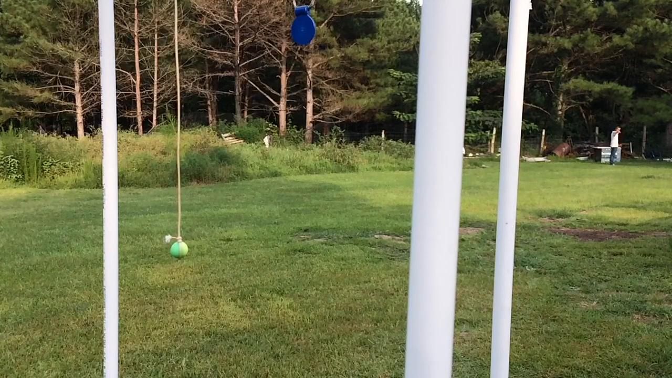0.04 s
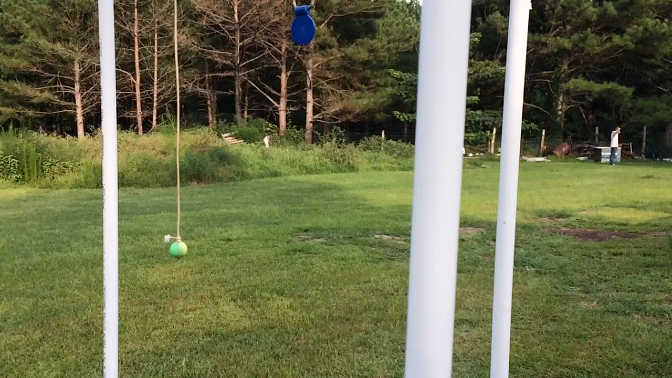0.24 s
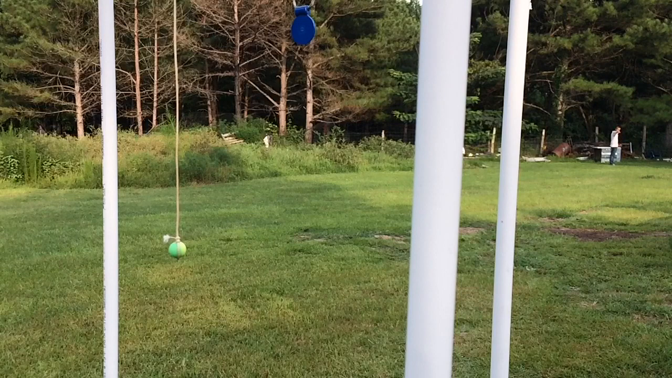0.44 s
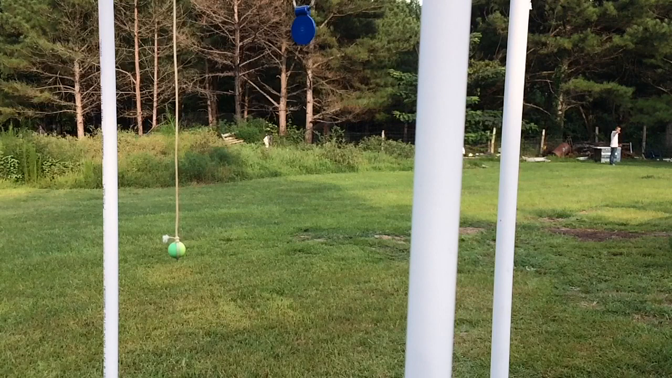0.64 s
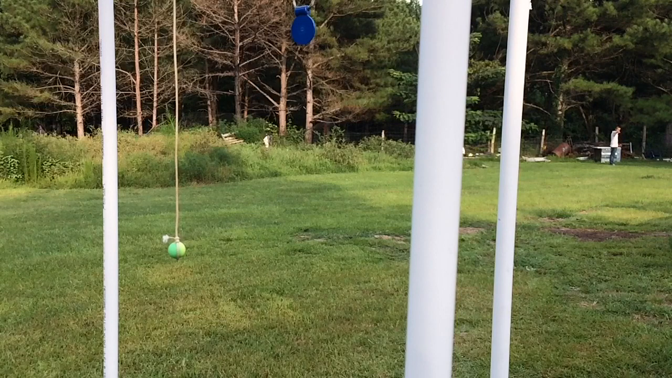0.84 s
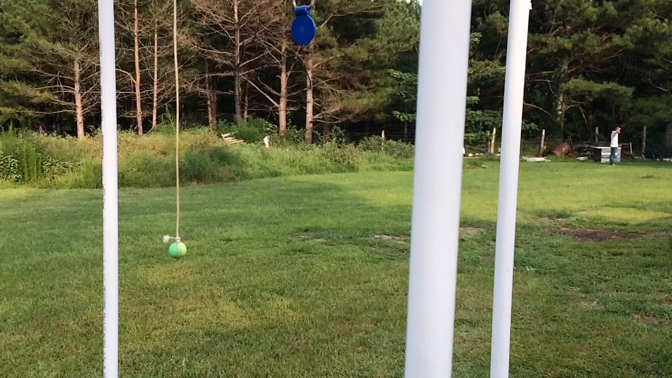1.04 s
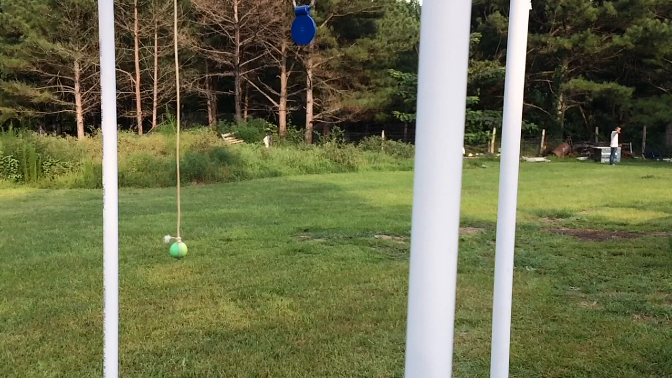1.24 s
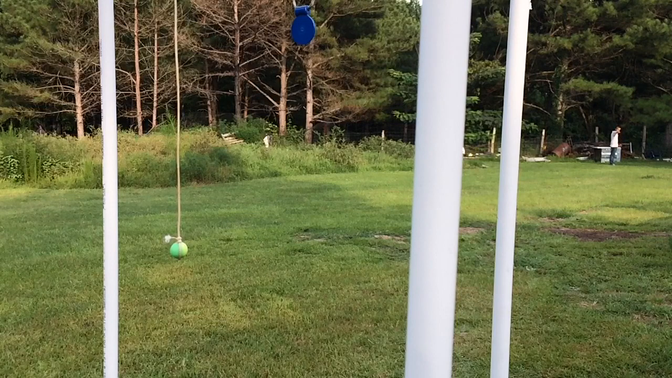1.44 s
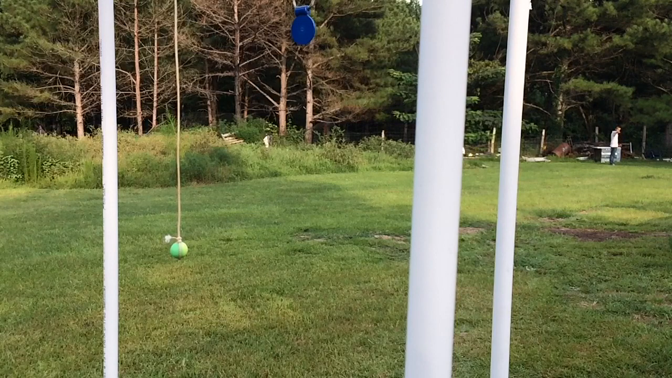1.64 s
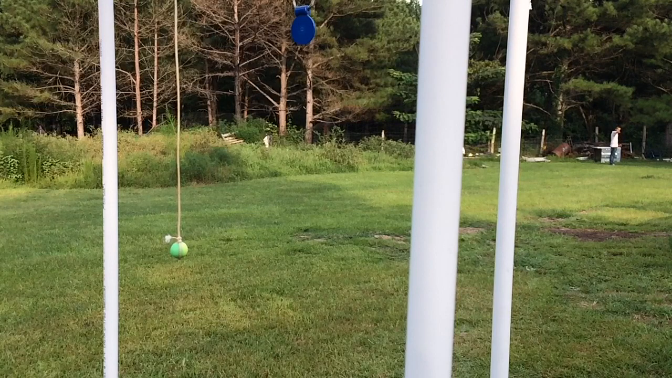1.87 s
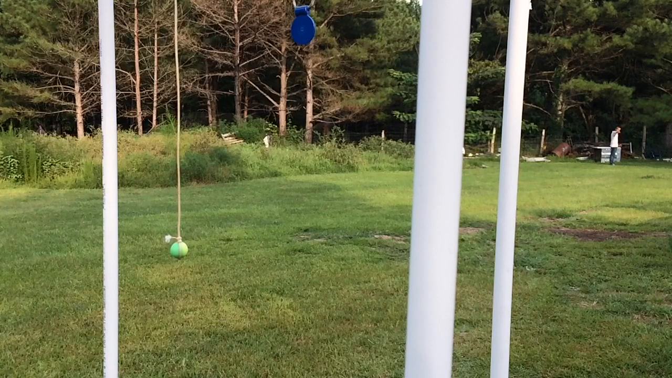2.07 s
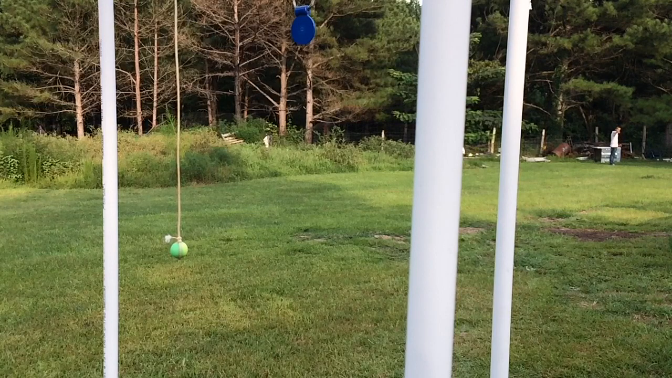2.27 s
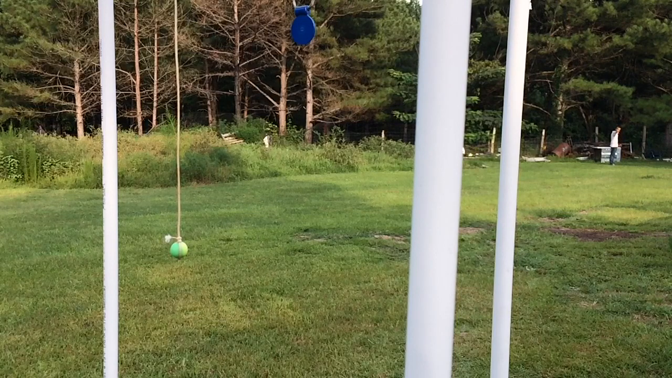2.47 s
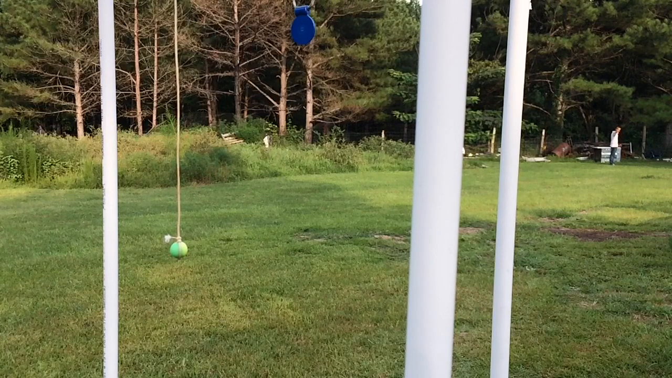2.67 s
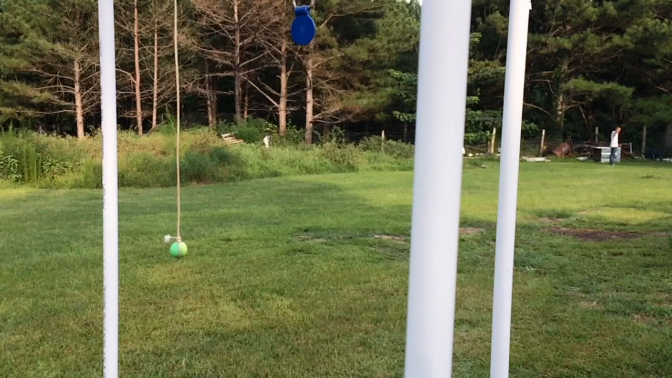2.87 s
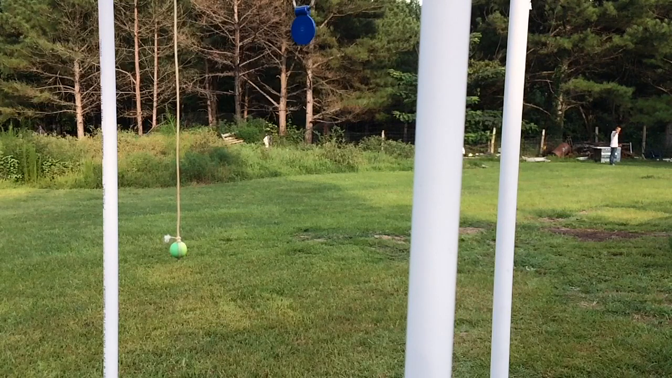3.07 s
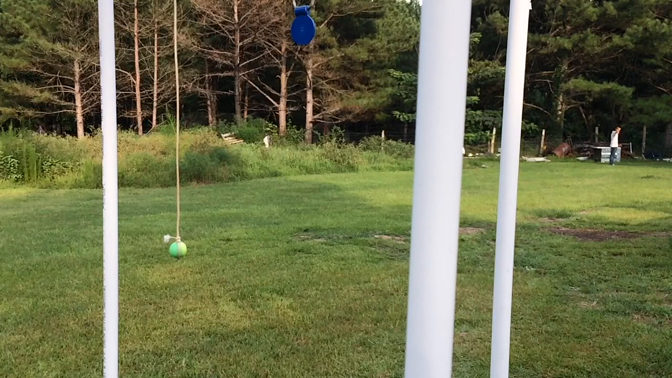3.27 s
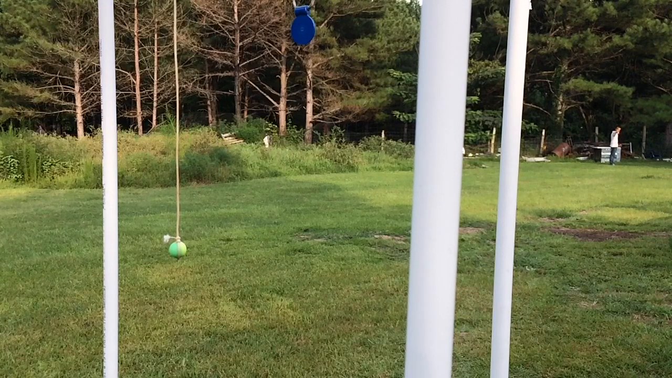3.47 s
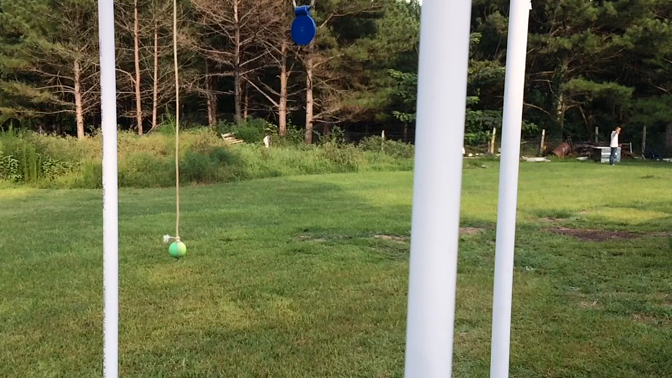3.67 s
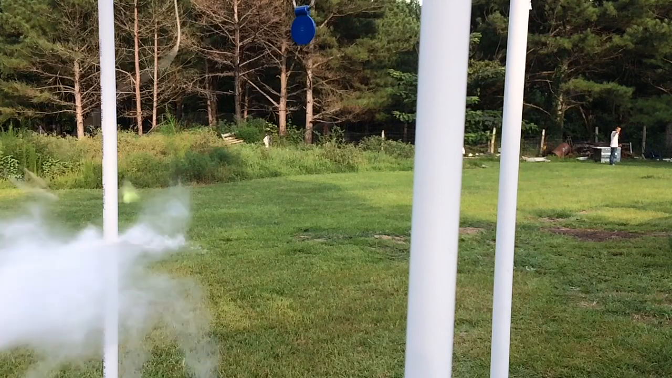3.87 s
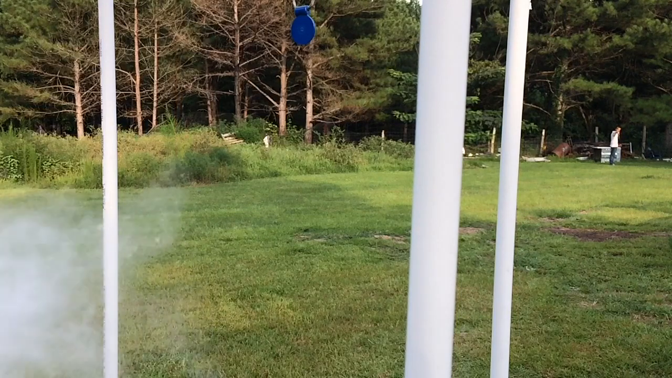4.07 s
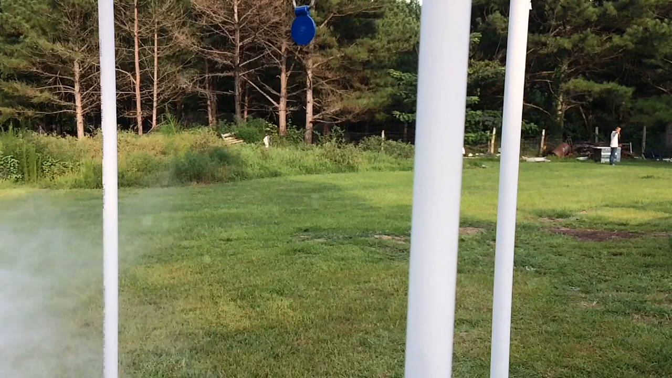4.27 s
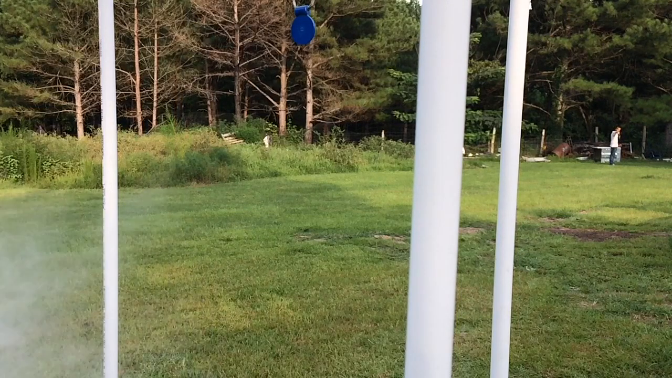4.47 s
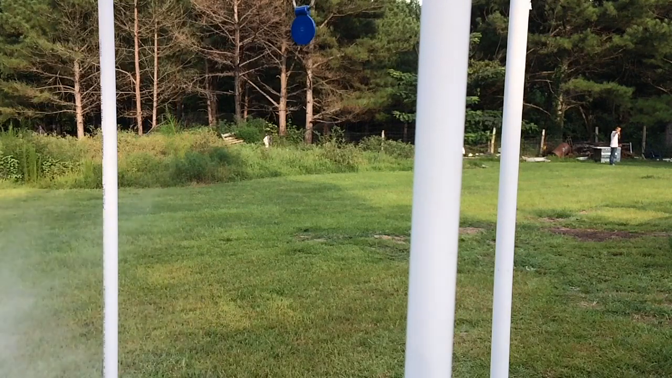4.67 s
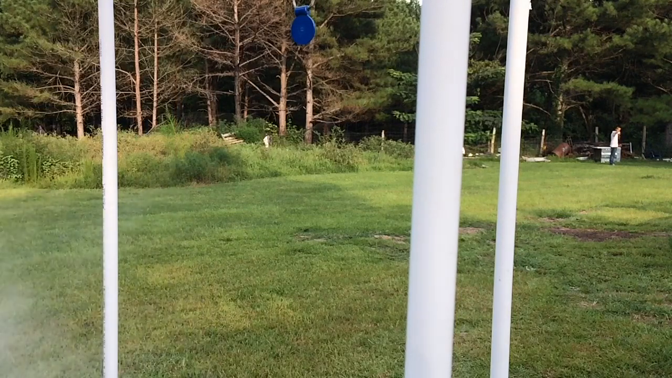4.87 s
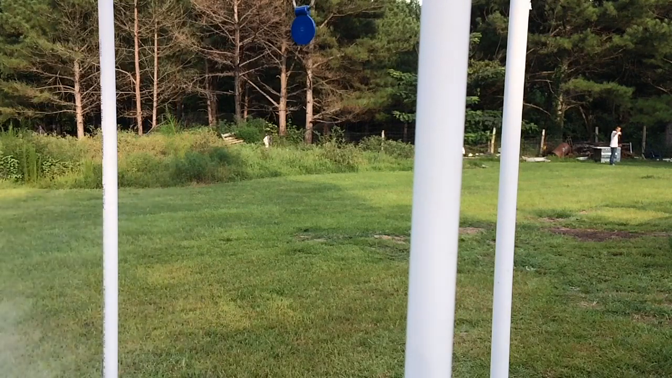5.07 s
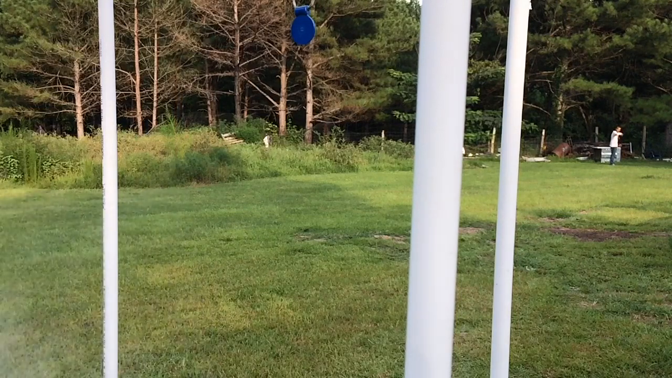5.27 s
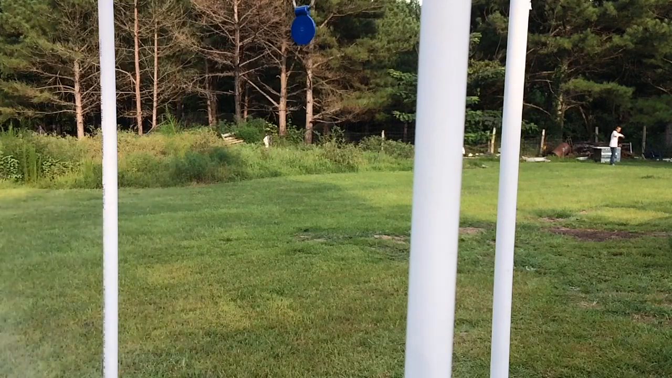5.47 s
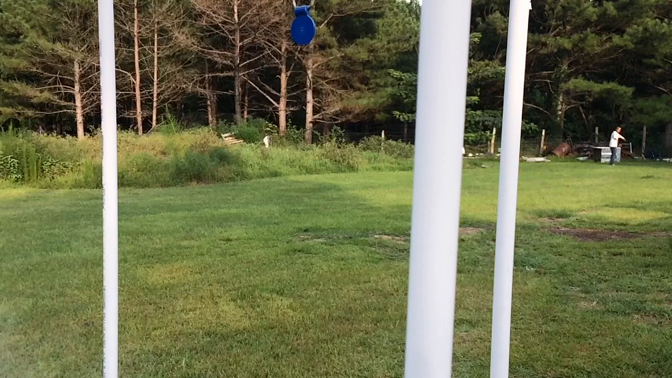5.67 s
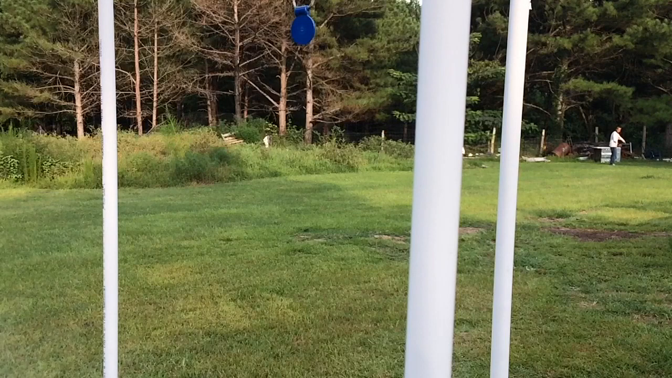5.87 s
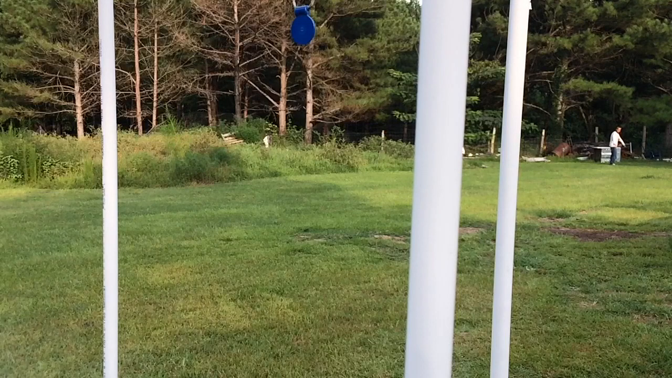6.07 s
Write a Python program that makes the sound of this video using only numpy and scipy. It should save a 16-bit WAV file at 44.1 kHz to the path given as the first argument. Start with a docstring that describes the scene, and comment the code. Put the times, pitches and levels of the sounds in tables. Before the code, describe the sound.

A slowed-down slingshot whips and slaps across a lawn, and the shot cracks into a close target, echoing over droning insects.

```python
"""A lawn edged by trees, the microphone beside a hanging target. Insects trill, a far bird calls, and
playback sinks to quarter speed. Across the grass a slingshot's bands whip and slap the fork. The ball
rushes closer, bursts the target, knocks on something behind it and hums away, shedding vortices.
Bits patter down and the tree line throws the crack back while the recorder's gain recovers.
The shot's pitches and all event times are as heard, slowed down, unless marked as real time."""
import sys
import numpy as np
from scipy import signal
from scipy.fft import rfft, irfft
from scipy.io import wavfile
from scipy.ndimage import uniform_filter1d, minimum_filter1d, map_coordinates

SR = 44100
rng = np.random.default_rng(int(sys.argv[2]) if len(sys.argv) > 2 else 0)


def put_to_file(sound):
    """Save the sound as 16-bit audio at rate SR, in the file named by the first command-line argument."""
    columns = np.atleast_2d(sound).T  # one column per channel
    safe = np.clip(columns, -1, 1)
    whole_steps = np.round(safe * 32767)
    wavfile.write(sys.argv[1], SR, whole_steps.astype(np.int16))


N = 269892
TIME_S = np.arange(N) / SR
LAUNCH_S, HIT_S, PASS_S = 3.0, 4.0537, .05 + 4.0204
SLOW_FROM_S, SLOW_UNTIL_S, SLOW_SPEED, STEPS_PER_S = 1.15, 1.63, .25, 30
SLOWED_TOP_HZ, RECORDER_TOP_HZ = 3920, 15750


def from_db(db):
    """Decibels to gain."""
    return 10 ** (np.asarray(db) / 20)


def rms_one(x):
    """Scale to unit rms."""
    return x / np.sqrt(np.mean(x ** 2) + 1e-20)


def fade(exponent):
    """Exponential fall to a floor far below hearing."""
    return np.exp(-np.minimum(exponent, 20))


def coloured(x, spectrum):
    """Give white noise a spectrum (freq_hz, density_db) that falls away beyond its ends; rms 1."""
    hz = np.maximum(np.arange(N // 2 + 1) * SR / N, 1)
    points_hz, db = np.transpose(spectrum)
    skirts = np.minimum(hz / points_hz[0], 1) ** 2 * np.minimum(points_hz[-1] / hz, 1) ** 4
    shape = from_db(np.interp(np.log(hz), np.log(points_hz), db))
    return rms_one(irfft(rfft(x) * skirts * shape, N))


def noise(spectrum):
    """Steady noise of rms 1 with a spectrum (freq_hz, density_db)."""
    return coloured(rng.standard_normal(N), spectrum)


def drift(rate_hz):
    """A smooth random wander of rms 1."""
    hz = np.arange(N // 2 + 1) * SR / N
    return rms_one(irfft(rfft(rng.standard_normal(N)) * np.exp(-(hz / rate_hz) ** 2), N))


def wavering(hz, width_hz):
    """An unsteady tone of rms 1: a narrow band that follows a pitch."""
    phase = 2 * np.pi * np.cumsum(hz * np.ones(N)) / SR
    return drift(width_hz) * np.cos(phase) + drift(width_hz) * np.sin(phase)


def low_pass(x, top_hz):
    """Steep cut of the treble that keeps the timing."""
    return signal.sosfiltfilt(signal.ellip(8, .1, 45, top_hz, fs=SR, output="sos"), x)


def bursts(blows):
    """Envelope of blows (peak_s, level_db, rise_s, decay_s) that swell and die; their powers add."""
    power = 0
    for peak_s, db, rise_s, decay_s in blows:
        from_peak = np.maximum((peak_s - TIME_S) / rise_s, (TIME_S - peak_s) / decay_s)
        power += (from_db(db) * fade(from_peak)) ** 2
    return np.sqrt(power)


def taps(rows, rise_share):
    """Envelope of taps (peak_s, level_db, decay_s), each rising in a share of its decay time."""
    return bursts([(s, db, rise_share * decay_s, decay_s) for s, db, decay_s in rows])


def struck(blows, modes, grit):
    """Each blow, part clean click and part rough contact, drives a body's resonances."""
    def body(force):
        ring = 0
        for k, (hz, width_hz, db) in enumerate(modes):
            radius = np.exp(-np.pi * width_hz / SR)
            poles = [1, -2 * radius * np.cos(2 * np.pi * hz / SR), radius ** 2]
            ring += (-1) ** k * from_db(db) * signal.lfilter([1 - radius, 0, radius - 1], poles, force)
        return ring
    clicks, white = np.zeros(N), rng.standard_normal(N)
    for s, db, rise_s, decay_s in blows:
        clicks[round(s * SR)] += from_db(db) * np.sqrt((rise_s + decay_s) * SR / 2)   # contact energy
    contact = np.sqrt(1 - grit ** 2) * clicks + grit * white * bursts(blows)
    return body(contact) / np.std(body(white))


def playback_speed():
    """The speed eases down from real time in small steps."""
    step_s = np.round(TIME_S * STEPS_PER_S) / STEPS_PER_S
    along = np.clip((step_s - SLOW_FROM_S) / (SLOW_UNTIL_S - SLOW_FROM_S), 0, 1)
    return SLOW_SPEED ** (3 * along ** 2 - 2 * along ** 3)


# Tick of a speed step: freq_hz, density_db
STEP_TICK_SPECTRUM = [(1000, -8), (3000, -3), (5500, -2), (8000, -14), (12000, -26)]
def step_ticks(speed, from_s=1.35, lag_s=.0047):
    """Late in the slow-down each step leaves a faint tick, softer as the speed falls."""
    steps = np.arange(int(from_s * STEPS_PER_S), int(SLOW_UNTIL_S * STEPS_PER_S))
    ticks = [(s, -62, .0003, .0005) for s in (steps + .5) / STEPS_PER_S + lag_s]
    return speed * bursts(ticks) * noise(STEP_TICK_SPECTRUM)


# One gust on the microphone: peak_s, level_db, rise_s, decay_s
GUST = [(6.11, -55.5, 0.033, 0.073)]
def breeze(level_db=-70):
    """Moving air rumbles softly on the microphone."""
    rumble = noise([(28, 2.0), (60, -4), (130, -22), (260, -13.5), (400, -23.5)])
    return (from_db(level_db) + bursts(GUST)) * rumble


def cricket(chirps, pitch_hz, width_hz, half_s, stroke_hz):
    """Short chirps (middle_s in real time, level_db), each a run of wing strokes."""
    swell = sum(from_db(db) * fade(((TIME_S - s) / half_s) ** 2) for s, db in chirps)
    strokes = np.sin(np.pi * stroke_hz * TIME_S) ** 2
    return swell * strokes * wavering(pitch_hz, width_hz) * np.sqrt(2)


# Open air and the insect chorus all round, in real time: freq_hz, density_db
AIR_SPECTRUM = [(25, -5.5), (60, 2), (120, 3.5), (190, -8), (300, -16), (600, -14), (1000, -16.5),
                (1600, -21), (2500, -26), (5500, -28.5), (11000, -36), (15500, -29)]
CHORUS_SPECTRUM = [(5900, -31.5), (6450, -21.5), (6750, -9), (7050, -2), (7300, -5.5), (7750, 0.5),
                   (8150, -4.5), (8550, -10.5), (8900, -24.5), (9600, -20.5), (10500, -48)]
# A lower cricket in the grass, chirping unevenly: middle_s, level_db
UNEVEN_CHIRPS = [(.05, -69), (.23, -69), (.43, -66.5), (.63, -65), (.82, -63), (1.04, -64.5), (1.3, -69),
                 (2.059, -63), (2.7, -69), (5.8, -66)]
def meadow(speed, air_db=-62, chorus_db=-56.5, chirp_db=-65, chirp_every_s=.248):
    """Air, insects and a near cricket as even as a clock, made in real time and read out slowing."""
    real_s = np.cumsum(speed) / SR
    chorus = from_db(chorus_db) * noise(CHORUS_SPECTRUM)
    even = [(s, chirp_db) for s in np.arange(.125, real_s[-1], chirp_every_s)]
    uneven = [(np.interp(s, TIME_S, real_s), db) for s, db in UNEVEN_CHIRPS]
    high = cricket(even, pitch_hz=9560, width_hz=240, half_s=.038, stroke_hz=105)
    low = cricket(uneven, pitch_hz=9200, width_hz=180, half_s=.035, stroke_hz=126)
    air = from_db(air_db) * noise(AIR_SPECTRUM)
    ambience = low_pass(air + chorus + high + low, RECORDER_TOP_HZ)
    return map_coordinates(ambience, [real_s * SR], order=5)


def bird(notes, partials_db, speed, blur_hz, blur, squareness):
    """Far notes swell, glide and fade, blurred by the woods; their pitch sinks with playback speed."""
    haze = [(drift(blur_hz), drift(blur_hz)) for _ in partials_db]
    song = 0
    for middle_s, half_s, hz, db, glide, overtones_db in notes:
        along = (TIME_S - middle_s) / half_s
        phase = 2 * np.pi * np.cumsum(hz * (1 + glide * np.tanh(along)) * speed) / SR
        swell = from_db(db) * fade(abs(along) ** squareness)
        for k, (partial_db, (sin_haze, cos_haze)) in enumerate(zip(partials_db, haze), 1):
            partial = (1 + blur * sin_haze) * np.sin(k * phase) + blur * cos_haze * np.cos(k * phase)
            song += swell * from_db(partial_db + overtones_db * (k > 1)) * partial
    return song


# Birds far off: middle_s, half_length_s, pitch_hz (real time), level_db, glide_share, overtones_db
HOARSE_CALL = [(1.272, 0.0707, 585.6, -59, 0.037, 1.5)]
CLEAR_NOTES = [(.86, .1, 1755, -73.5, -0.017, -29), (1.44, .06, 1133, -71, .005, -3),
               (1.82, .22, 1154, -70, .002, -4.5), (2.25, 0.26, 1155, -68.5, 0.00052, 0.5)]
def far_birds(speed):
    """One hoarse call, rich in overtones, and a few clear notes carry from the woods."""
    hoarse_db, clear_db = [0, -3.5, -10.5, -18, -21, -19, -28, -27], [0, -12, -15.5]
    call = bird(HOARSE_CALL, hoarse_db, speed, blur_hz=45, blur=.48, squareness=1.3)
    return call + bird(CLEAR_NOTES, clear_db, speed, blur_hz=6, blur=.29, squareness=5)


# Stretches of the distant tree line answering: peak_s, level_db, rise_s, decay_s
TWIG_ECHOES = [(2.81, -51.5, 0.0071, 0.15), (3.0, -46.5, 0.061, 0.27), (3.6, -60, 0.17, 0.18),
               (5.146, -46.5, 0.0034, 0.063), (5.31, -54.5, 0.15, 0.29), (5.74, -65.5, 0.058, 0.06)]
# Single trunks answering: peak_s, level_db, decay_s
TRUNK_ECHOES = [(3.115, -50.5, .008), (3.178, -43.5, 0.006), (5.142, -44, .0048), (5.2128, -36, .0018),
                (5.218, -51.5, .0044), (5.378, -46.5, 0.0059), (5.409, -51, .002), (5.419, -48.5, .002),
                (5.445, -45, .003)]
# Both as they reach the microphone: freq_hz, density_db
TWIG_SPECTRUM = [(100, -12.5), (250, -3.5), (450, -0.5), (800, -1), (1200, -1), (2000, -3), (3000, -8),
                 (4000, -17)]
TRUNK_SPECTRUM = [(100, -9), (230, 0.5), (560, 8.5), (1050, -6), (1450, -12), (2000, -12.5), (3000, -23),
                  (4000, -19)]
def tree_line():
    """Countless twigs and a few trunks send the whip, the slap and the crack back."""
    scatter = rng.standard_normal(N) * from_db(2.6 * drift(300) + drift(25))
    twigs = bursts(TWIG_ECHOES) * coloured(scatter, TWIG_SPECTRUM)
    return twigs + taps(TRUNK_ECHOES, rise_share=.12) * noise(TRUNK_SPECTRUM)


# Light ticks, most of them bits of target landing: peak_s, level_db, decay_s, crackle_share
TICKS = [(2.533, -60, 0.001, 0.5), (4.393, -45.5, 0.005, 0), (4.408, -46.5, 0.0062, .05),
         (4.49, -59.5, 0.014, .05), (4.594, -49, 0.007, 0.32), (4.65, -60.5, 0.0091, .7),
         (4.735, -57, 0.03, 0.52), (4.801, -56.5, 0.0059, 0.04), (5.051, -54, 0.0085, 0),
         (5.108, -53, 0.012, 0), (5.735, -56.5, 0.016, 0.56)]
# Their dull and bright parts: freq_hz, density_db
THUD_SPECTRUM = [(150, 7), (400, 6.5), (1000, -2.5), (2500, -31.5), (4000, -8)]
CRACKLE_SPECTRUM = [(1200, -3), (2500, -9.5), (3400, 2), (4000, -1.5)]
def patter(rise_share=.28):
    """Bits patter down, each tick part dull thud, part bright crackle."""
    dull = [(s, db + 20 * np.log10(max(1 - share, .01)), decay_s) for s, db, decay_s, share in TICKS]
    bright = [(s, db + 20 * np.log10(max(share, .01)), decay_s) for s, db, decay_s, share in TICKS]
    thuds = taps(dull, rise_share) * noise(THUD_SPECTRUM)
    return thuds + taps(bright, rise_share) * noise(CRACKLE_SPECTRUM)


def wake(level_db=-40.5, start_hz=172.5, end_hz=51.3, sink_s=.2, hold_s=.24, release_s=.073):
    """Eddies behind the burst target grow larger and lower; their rumble holds, then dies."""
    age_s = np.maximum(TIME_S - HIT_S, 0)
    pitch_hz = end_hz + (start_hz - end_hz) * np.exp(-age_s / sink_s)
    envelope = (age_s > 0) * np.exp(-np.maximum(age_s - hold_s, 0) / release_s)
    return from_db(level_db) * envelope * wavering(pitch_hz, width_hz=55)


def bright_edge(slaps, cracks, slap_gain_db=-52, crack_gain_db=-50.5):
    """Only the sharpest blows keep a faint edge of treble."""
    edge = from_db(slap_gain_db) * bursts(slaps) + from_db(crack_gain_db) * bursts(cracks)
    return edge * noise([(3900, -11.5), (4500, 4), (6000, -6), (9000, -16), (11000, -22)])


# Bands and pouch, across the lawn: peak_s, level_db, rise_s, decay_s
BAND_WHIP = [(2.830, -36, 0.0022, 0.005), (2.842, -25, 0.0053, 0.0048), (2.853, -44.5, 0.0047, 0.018)]
BAND_FLUTTER = [(2.830, -37.5, 0.0026, 0.0047), (2.848, -40.5, 0.0067, 0.024), (2.877, -35, 0.0076, 0.0012)]
FORK_SLAPS = [(2.9996, -13.5, 0.00039, 0.0011), (3.0015, -17, .0003, 0.0011),
              (3.0043, -17.5, 0.00045, 0.0011), (3.011, -37, 0.0027, 0.01)]
POUCH_REBOUND = [(3.0262, -25, .0004, .0022)]
# Swish of the bands and tap of the pouch: freq_hz, density_db
WHIP_SPECTRUM = [(88, -43), (150, -27), (298, 1), (569, -7.5), (802, -21.5), (1110, 0.5), (1640, -16.5),
                 (2040, -4.5), (2310, -14.5), (2840, -6.5), (3350, -18.5), (3840, -15.5), (4000, -20),
                 (5200, -36.5), (8800, -120)]
REBOUND_SPECTRUM = [(200, -13.5), (500, 2.5), (900, -11), (1400, 2.5), (2700, 0), (3400, -19), (4000, -24)]
# Resonances of the fork: pitch_hz, width_hz, level_db
FORK_MODES = [(447, 48, 4), (593, 47, -0.5), (1030, 130, 6), (1320, 160, 1), (1804, 310, -1),
              (2080, 170, -1.5), (2450, 320, -6.5), (2800, 190, -3.5), (3406, 205, -1.5), (3870, 160, -15)]
def slingshot():
    """The bands whip through the air, flutter and slap the fork; the pouch rebounds more lightly."""
    flutter = bursts(BAND_FLUTTER) * noise([(50, 5.5), (150, -25.5), (290, -1), (500, 1), (700, -19)])
    whip = bursts(BAND_WHIP) * noise(WHIP_SPECTRUM)
    slap = struck(FORK_SLAPS, FORK_MODES, grit=.86)
    rebound = bursts(POUCH_REBOUND) * noise(REBOUND_SPECTRUM)
    return whip + flutter + slap + rebound


# Air round the ball, and low buffeting felt only close to the microphone: freq_hz, density_db
RUSH_SPECTRUM = [(60, -13.5), (200, -6.5), (400, 3), (750, 1.5), (1200, -1), (2000, -4.5), (3000, -11),
                 (4000, -13.5)]
BUFFET_SPECTRUM = [(25, 0), (50, -2.5), (100, -14), (200, -28.5)]
def ball(rush_db=-33, hum_db=-36, buffet_db=-34.5, hum_hz=344.2, mach=.26, half_speed_s=.98):
    """Air rushes round the ball, louder as it nears; its vortex hum drops as it passes and slows."""
    along = (TIME_S - PASS_S) / .05   # in units of its nearest distance to the microphone
    distance = np.hypot(1, along)
    receding = along / distance   # -1 coming, +1 going
    decades = np.log10(distance)   # each layer loses its own dB per tenfold distance
    speed = 1 / (1 + np.maximum(TIME_S - HIT_S, 0) / half_speed_s)
    dip_db = -13.5 * fade(((TIME_S - 4.044) / .009) ** 2)   # the rush dips just before the hit
    turbulence = from_db(1.3 * drift(50))
    rush = from_db(rush_db - 27 * decades + dip_db) * speed * turbulence * noise(RUSH_SPECTRUM)
    heard_hz = hum_hz * speed / (1 + mach * receding)
    hum = from_db(hum_db - 35.5 * decades + 2.5 * receding) * wavering(heard_hz, width_hz=22)
    buffet = from_db(buffet_db - 44 * decades) * noise(BUFFET_SPECTRUM)
    return (TIME_S > LAUNCH_S) * (rush + hum + buffet)


# The hit, right beside the microphone, and the knock behind it: peak_s, level_db, rise_s, decay_s
BOW_WAVE = [(3.997, -26, 0.015, .012)]
SUCTION = [(4.028, -12.5, 0.0076, 0.0053), (4.048, -20.5, .014, 0.006), (4.089, -14, 0.0022, 0.002)]
TARGET_CRACKS = [(4.0539, -3, .0002, 0.0017), (4.0550, -6.5, .0003, 0.0014), (4.0605, -21.5, .001, .003),
                 (4.0745, -20, 0.0012, 0.0026)]
KNOCKS = [(4.208, -25, 0.00023, 0.0027), (4.2102, -24.5, 0.00043, 0.0042), (4.226, -37, 0.00196, 0.0049)]
# Resonances of the target: pitch_hz, width_hz, level_db
TARGET_MODES = [(280, 110, -6), (455, 190, -7.5), (685.5, 220, 3), (938, 138, 3.5), (1030, 160, 0.5),
                (1787, 620, -7), (2316, 360, -9.5), (3230, 460, -13), (3840, 360, -18.5)]
# Whatever the ball strikes behind the target: freq_hz, density_db
KNOCK_SPECTRUM = [(120, -34), (200, 2), (457, -15), (727, 5), (1050, -2.5), (1330, 3.5), (1580, -8),
                  (1910, 3.5), (2330, -12.5), (3110, -1), (3310, -22), (3480, -40), (4000, -33),
                  (5200, -53), (8800, -120)]
def target(push_gain_db=2, front_s=.0003, decay_s=.0066, leak_hz=11):
    """Air piles up ahead of the ball and draws away; the target cracks on a steep push of air."""
    age_s = np.maximum(TIME_S - HIT_S, 0)
    push = from_db(push_gain_db) * (1 - np.exp(-age_s / front_s)) * fade(age_s / decay_s)
    # the microphone lets steady pressure leak away, so the push swings back
    push = signal.sosfilt(signal.butter(2, leak_hz, "high", fs=SR, output="sos"), push)
    pressure = bursts(BOW_WAVE) - bursts(SUCTION) + push
    crack = struck(TARGET_CRACKS, TARGET_MODES, grit=.5)
    return pressure + crack + bursts(KNOCKS) * noise(KNOCK_SPECTRUM)


def scene():
    """The meadow and the slowed shot, whose treble ends two octaves lower, at one microphone."""
    speed = playback_speed()
    birds = far_birds(speed)
    hit = target()
    shot = low_pass(slingshot() + ball() + hit + wake() + patter() + tree_line(), SLOWED_TOP_HZ)
    background = meadow(speed) + breeze() + birds
    return (background + shot + bright_edge(FORK_SLAPS, TARGET_CRACKS) + step_ticks(speed))[None]


def gain_control(x, threshold_db, max_cut_db, hold_s, release_db_per_s):
    """A peak over the threshold turns the gain down; it holds, then creeps back."""
    over_db = np.clip(20 * np.log10(abs(x) + 1e-9) - threshold_db, 0, max_cut_db)
    hold = int(hold_s * SR) | 1
    held_db = -minimum_filter1d(-over_db, hold, origin=hold // 2, mode="constant")
    release_db = release_db_per_s * TIME_S
    cut_db = np.maximum.accumulate(held_db + release_db) - release_db
    gain_db = uniform_filter1d(minimum_filter1d(-cut_db, size=512), size=512)
    return x * from_db(gain_db)


def record(dry):
    """The recorder ducks on the crack and cuts the highest treble."""
    ducked = gain_control(dry[0], threshold_db=-5.5, max_cut_db=4, hold_s=1, release_db_per_s=14)
    return low_pass(ducked, RECORDER_TOP_HZ)[None]


dry = scene()
out = record(dry)
put_to_file(out)
```